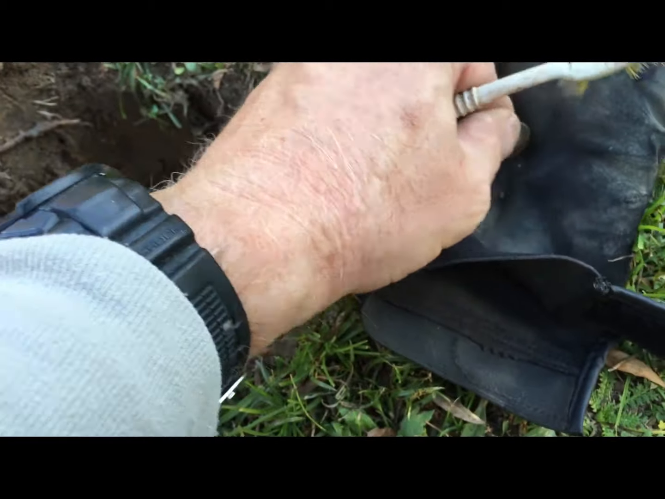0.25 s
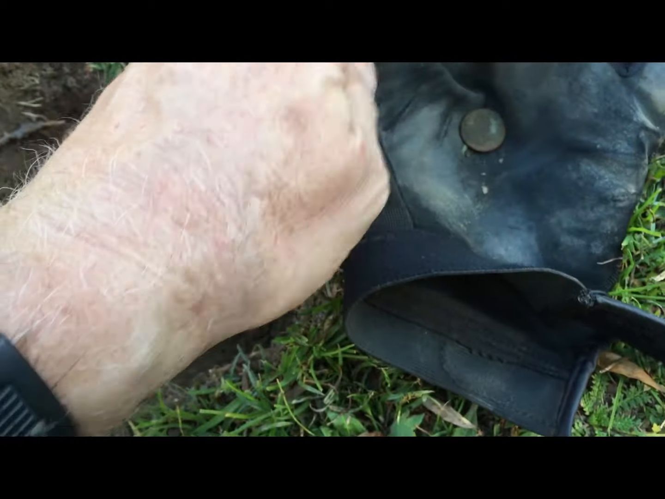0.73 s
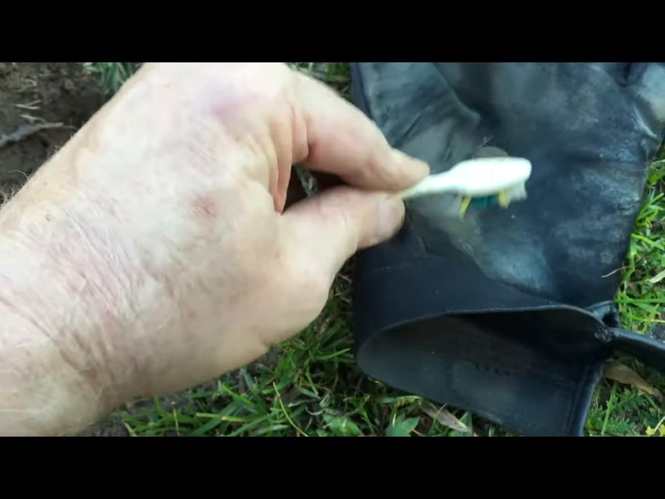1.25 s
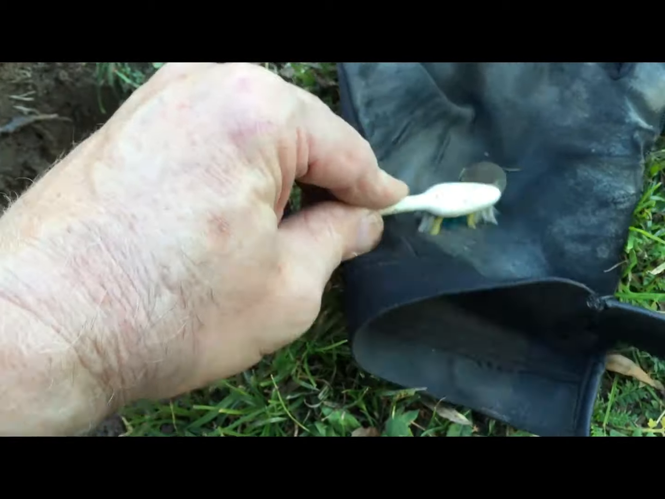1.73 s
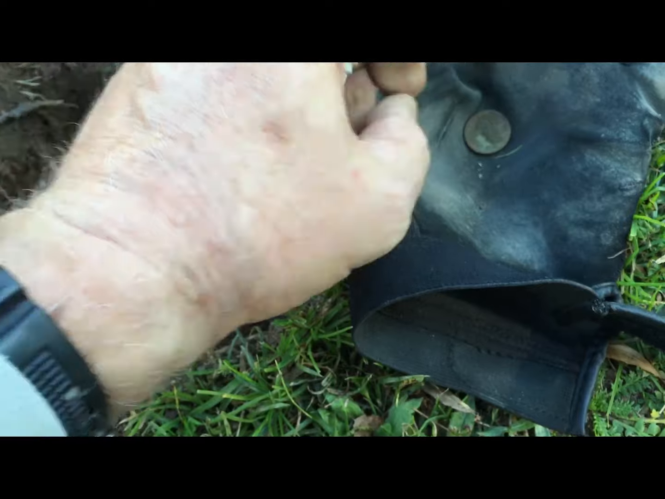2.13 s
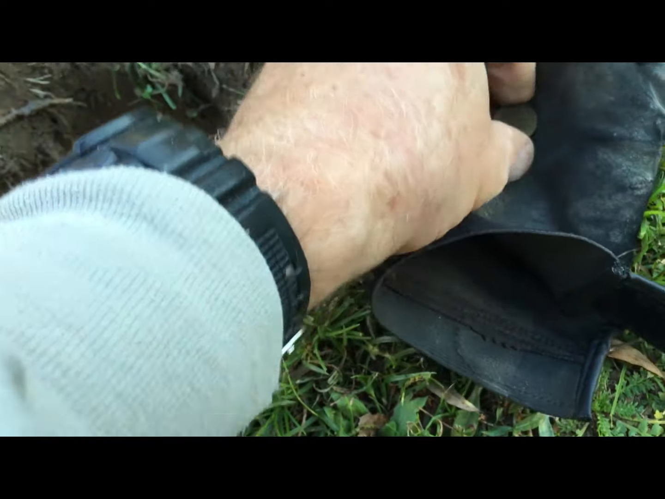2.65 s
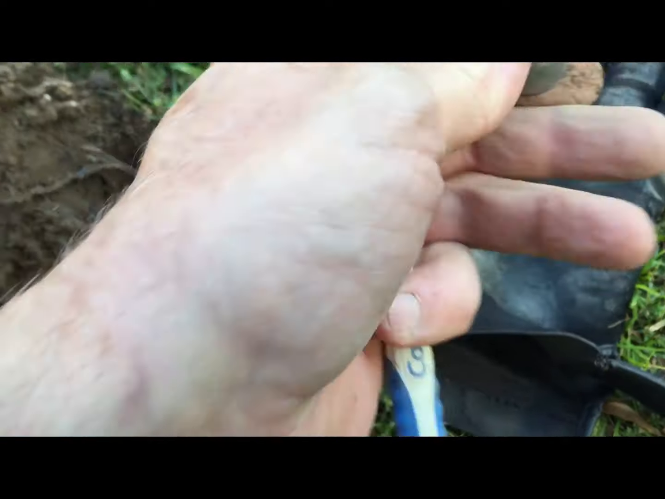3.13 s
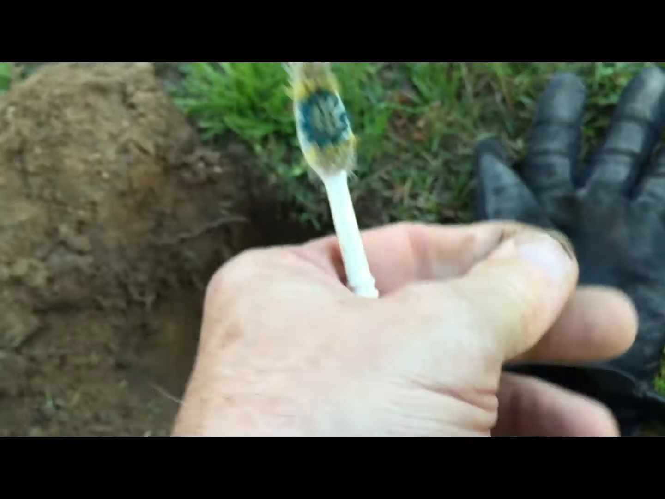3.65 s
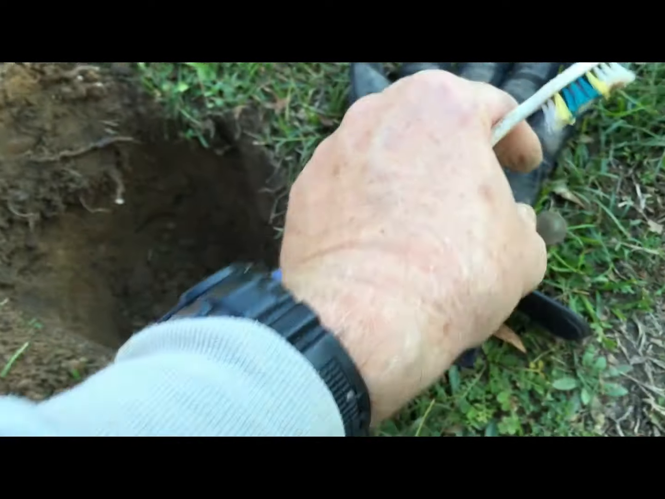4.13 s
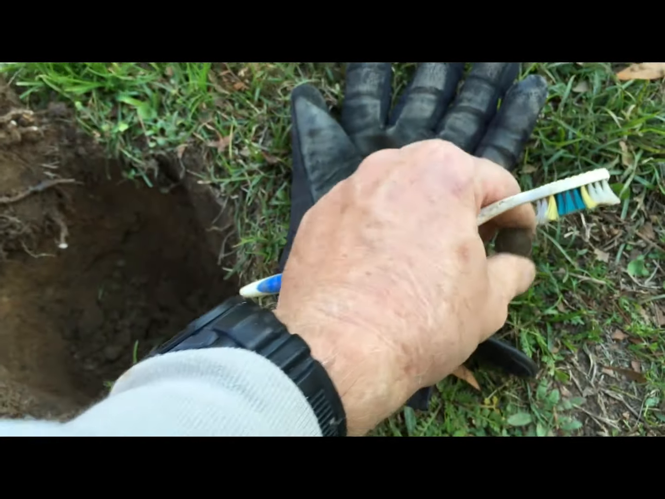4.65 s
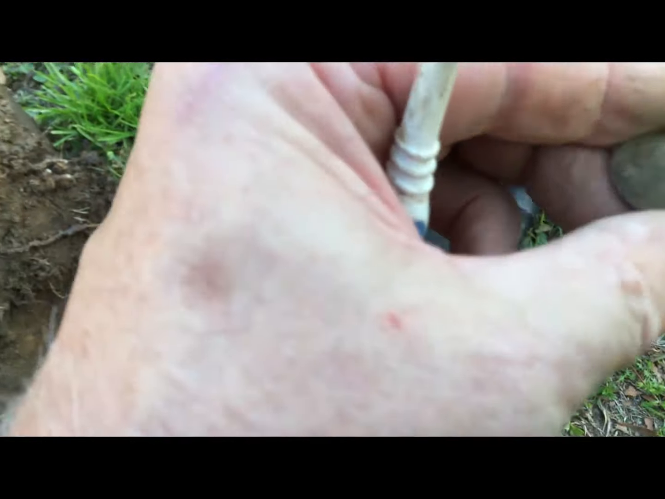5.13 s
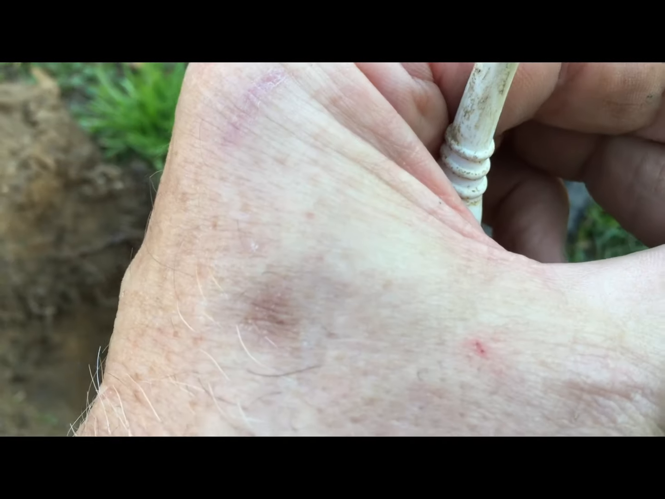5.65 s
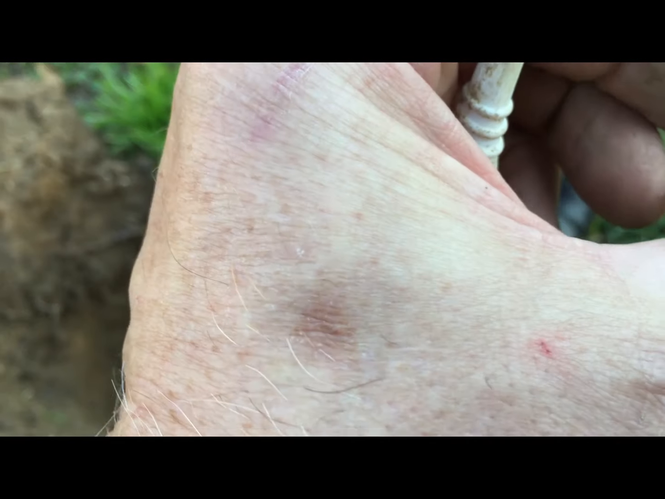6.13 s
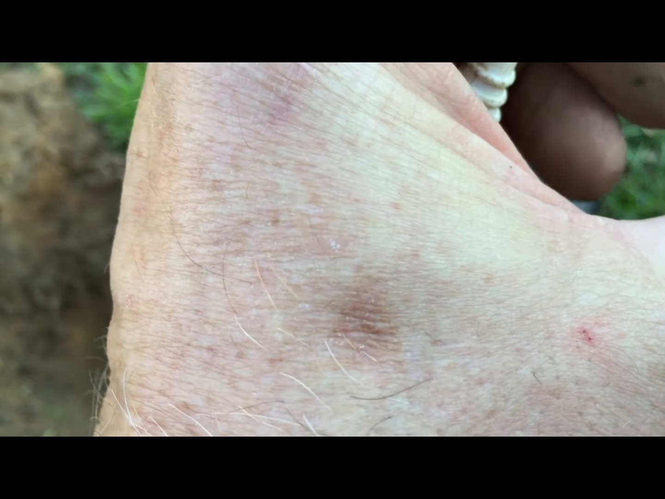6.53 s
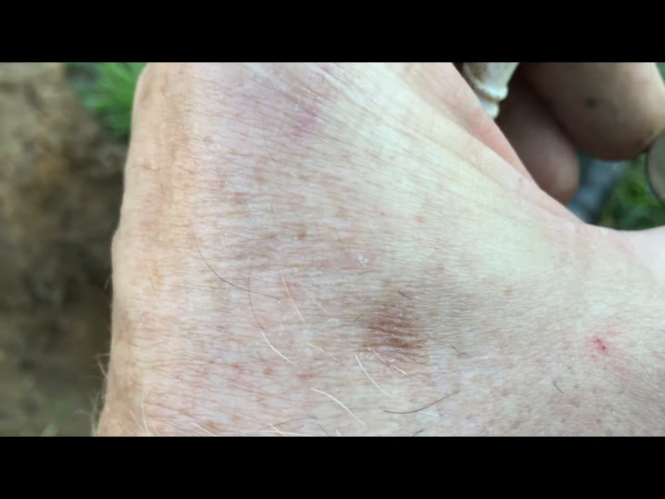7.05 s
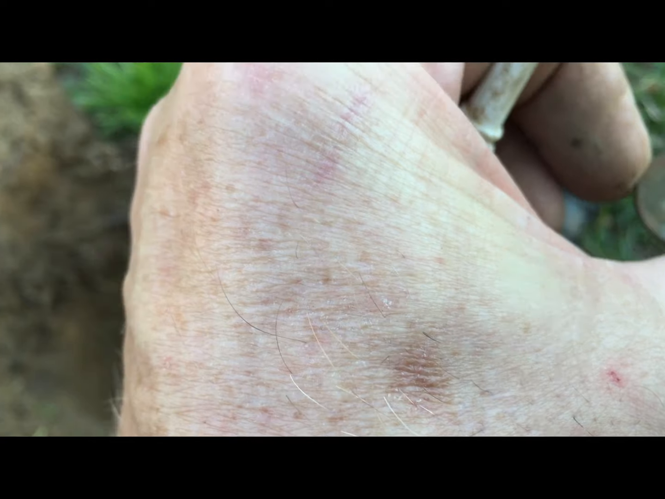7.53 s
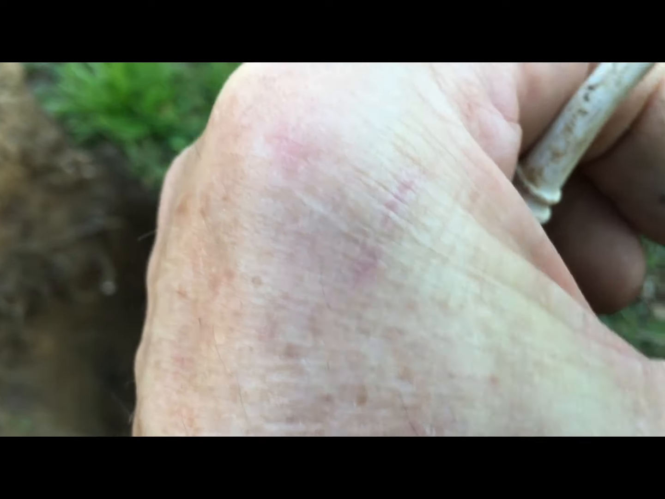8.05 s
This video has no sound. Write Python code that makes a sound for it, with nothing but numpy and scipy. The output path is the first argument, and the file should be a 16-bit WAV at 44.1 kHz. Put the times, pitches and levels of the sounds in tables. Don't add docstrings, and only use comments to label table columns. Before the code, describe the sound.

A low, booming engine hum dominates the distance, climbing and falling in pitch as a vehicle pulls away. In front of it, dry and close, a toothbrush scratches dirt from a coin lying on a leather glove, with tiny nail and grit ticks. Airy rubs of skin on the handle come next, then barely audible creaks. The ending is mostly soft traffic rumble and a quiet, steady engine. Single-channel, open-air handheld pickup.

```python
import sys
import numpy as np
from scipy import signal
from scipy.io import wavfile

SR = 44100
rng = np.random.default_rng(int(sys.argv[2]) if len(sys.argv) > 2 else 0)


def persist_wave(psi):
    counts = np.round(np.clip(psi, -1, 1) * 32767).astype(np.int16)
    wavfile.write(sys.argv[1], SR, np.atleast_2d(counts).T)


def level_to_linear(level):
    exponent = np.asarray(level, float) / 20
    return 10 ** exponent


N = 365789
TIME = np.arange(N) / SR

# pitch in Hz, width in Hz, level in dB.
GLOVE_MODES = [(1016, 700, 1), (1593, 350, 2), (1984, 224, 6), (2500, 180, 0)]
COIN_MODES = [(2970, 500, -1), (3700, 670, -3.5), (4400, 740, -3), (5450, 660, -4)]
BRISTLE_SHAFT_MODES = [(6000, 480, 3), (6720, 1000, 0.5), (9100, 1600, -6)]
BRISTLE_TIP_MODES = [(8450, 2200, -6.5), (10380, 1750, -7.5), (11860, 580, 8)]
# hardest moment in seconds, rise in seconds, fall in seconds, level in dB, brightness in dB.
BRUSH_STROKES = [(1.2, 0.028, 0.017, -63, -8), (1.216, 0.043, 0.03, -55, -1.5),
                 (1.26, 0.089, 0.075, -59, 1), (1.318, 0.065, 0.051, -48.5, 0),
                 (1.341, 0.037, 0.047, -48, 1), (1.395, 0.15, 0.075, -55, -2.5),
                 (1.585, .025, 0.07, -72, -20), (1.635, 0.062, 0.096, -52.5, -0.5),
                 (1.75, .07, 0.048, -56, -6.5), (1.795, 0.031, 0.06, -65.5, -7.5),
                 (1.895, 0.039, 0.03, -62.5, -8.5), (1.946, 0.087, 0.094, -55.5, -1.5),
                 (2.06, .07, 0.11, -49.5, 0), (2.11, 0.057, 0.05, -59, -4), (2.56, .12, 0.26, -62.5, -5),
                 (2.66, 0.093, 0.067, -56.5, -6.5), (2.86, .06, 0.073, -56, -5),
                 (2.899, .04, 0.042, -59.5, -9)]
FINGER_RUBS = [(0.0, .03, 0.02, -69, 8), (.115, 0.16, 0.25, -73, -7.5), (.3, 0.13, 0.11, -70.5, -4),
               (.368, .04, 0.023, -62.5, -8), (.49, 0.06, 0.068, -65.5, -10),
               (.575, 0.097, 0.072, -63, -13), (.66, 0.24, 0.22, -73.5, -8.5), (.78, 0.13, 0.044, -81, 16),
               (.934, 0.043, 0.044, -66.5, 5), (.99, 0.19, 0.17, -75, 17), (2.3, 0.11, 0.22, -77, 7),
               (2.78, 0.064, 0.057, -75, -1), (2.99, 0.079, 0.14, -65.5, -4.5),
               (3.17, 0.093, 0.049, -75, 31), (3.235, 0.11, .04, -72, -3), (3.288, 0.012, 0.056, -59, 14),
               (3.33, 0.087, 0.093, -65.5, 14), (3.84, 0.056, 0.045, -79, 31),
               (3.88, 0.021, 0.039, -56.5, 11), (3.94, 0.12, .08, -64, 19), (4.074, 0.016, 0.027, -61, 9),
               (4.828, 0.052, .05, -77.5, 1)]
# level in dB, share of the brightness (a factor), stretch of rise and fall (a factor).
BRUSH_PARTS = [(0, -0.8, 0.99), (0, -0.4, 0.9), (0, 0.5, 0.94), (0, 0.37, 0.87)]
FINGER_PARTS = [(0.58, -0.56, 0.93), (-0.32, -.25, 1.23), (0.4, 0.18, 0.93), (0.5, 0.36, 1.18)]
EDGE_DB, ROUNDNESS = 23.5, 1.35
GRIT_PER_S, GRIT_DB = 300, 18
FIRST_STROKE_S, CLEARING_S = 1.19, .3

# start in seconds, peak in dB, pitch in Hz, second pitch in Hz, time to fall by 60 dB in seconds.
TICKS = [(0.358, -45.5, 1016, 1500, 0.011), (.369, -47.5, 1380, 6300, 0.014),
         (0.592, -40, 900, 2340, 0.0083), (0.7818, -50, 9100, 10600, 0.0038),
         (.931, -35.5, 6000, 4700, 0.0023), (1.1975, -37.5, 3144, 1900, 0.0026),
         (1.215, -38, 1470, 5450, 0.0086), (1.251, -39.5, 1720, 3500, 0.0054),
         (1.284, -34.5, 5400, 3300, 0.0049), (1.5787, -42.5, 1020, 6000, 0.01),
         (1.598, -41, 4210, 5450, 0.0062), (1.61, -33, 4522, 8600, 0.0022),
         (2.6045, -43, 8500, 6000, 0.0037), (2.699, -46.5, 1954, 3500, 0.011),
         (2.9756, -33, 1698, 3756, 0.0055), (2.977, -44, 666, 401, 0.0077), (3.177, -50, 7700, 9600, 0.005),
         (3.2247, -38, 1564, 3570, 0.0079), (3.2857, -40, 7200, 4230, 0.0045),
         (3.8778, -36.5, 4600, 2310, 0.0025), (4.334, -56, 600, 10660, 0.012),
         (4.34, -46.5, 1300, 3980, 0.0037), (5.049, -56.5, 3700, 620, 0.015),
         (6.6293, -58, 11530, 9506, .006)]
SECOND_MODE_DB = -6.5

# start in seconds, length in seconds, pitch in Hz, width in Hz, level in dB.
CREAKS = [(4.13, .39, 1255, 110, -65.5), (4.28, .1, 1250, 120, -69), (4.19, .1, 1770, 100, -74),
          (4.46, .1, 1950, 110, -74), (4.57, .1, 1480, 100, -74), (4.72, .14, 1450, 120, -71.5),
          (4.5, .25, 4500, 250, -86), (4.5, .3, 5450, 300, -86), (4.825, .03, 5750, 500, -76),
          (5.615, .035, 2330, 100, -70), (5.81, .05, 1880, 90, -76), (6.33, .1, 2400, 200, -73.5),
          (6.34, .1, 2800, 200, -80), (6.45, .12, 2330, 220, -75), (6.6, .08, 1900, 120, -71),
          (1.785, .025, 2000, 300, -61), (1.812, .018, 3700, 1000, -63), (3.55, .17, 8500, 4000, -80),
          (4.2, .25, 2450, 300, -77)]
# start in
# seconds, length in seconds, pitch in Hz, width in Hz, level in dB.
SLIDES = [
    (3.29, .12, 7400, 2592, -65),
    (3.81, .1, 8400, 3800, -55.5),
    (3.9, 0.092, 7200, 2500, -63.5),
    (.08, .1, 1850, 800, -65.5),
    (3.85, .14, 2310, 250, -68),
    (4.058, .034, 7300, 3900, -51.5),
    (.27, 0.066, 1530, 180, -70),
    (4.37, .02, 3990, 450, -74),
]

# time in seconds, firing tone in Hz, firing tone level in dB, lower tone level in dB.
REVS = [(0, 112.7, -40, -44.5), (.62, 128.5, -40.5, -39.5), (.95, 142.8, -34.5, -44.5),
        (1.42, 160, -41, -43.5), (1.58, 155.2, -38, -46), (1.85, 128, -40.5, -39),
        (2.6, 131.1, -38.5, -47.5), (3.15, 140.9, -37, -40.5), (3.64, 99.03, -41.5, -46),
        (4.0, 104, -42, -46), (4.45, 109.8, -42, -59), (4.85, 114.5, -39.5, -45), (5.5, 122.8, -43, -47),
        (5.85, 124.1, -51.5, -44.5), (6.2, 126.5, -40, -47), (6.65, 127.1, -51.5, -43.5),
        (7.05, 102.7, -65, -46), (8.29, 92.45, -93, -74)]
LOWER_ORDER = .632
# multiple of the firing tone, level in dB.
SIDE_ORDERS = [(.375, -15.5), (.875, -12.5), (1.25, -22.5), (1.5, -34.5), (.75, -16.5)]
# time in seconds, pitch in Hz, level in dB.
BOOM = [
    (0, 65.14, -33.5),
    (.8, 65.55, -47),
    (1.4, 66.34, -32.5),
    (1.75, 68.45, -42),
    (2.45, 67.8, -42),
    (2.8, 68.94, -34),
    (3.15, 70.3, -39.5),
    (3.502, 59.5, -44.5),
    (4.6, 58.92, -55),
]
# time in seconds, pitch in Hz, level in dB.
COASTING_BOOM = [
    (5.95, 79.1, -75),
    (6.22, 75, -46),
    (6.48, 64.6, -54),
    (6.85, 63.8, -52),
]
# delay in seconds, level in dB.
ECHOES = [(.17, 0), (.42, -2), (.62, -5)]
# start in seconds, length in seconds, echo level in dB.
SHIFTS = [
    (1.45, .85, -2),
    (3.3, .75, -11),
]
WALLS_DB = -19

# time in seconds, firing tone in Hz, level in dB.
IDLER = [
    (0, 33.0, -75),
    (5.3, 33.0, -66),
    (6.2, 33.0, -58),
    (8.29, 33.0, -56.5),
]
# multiple of its firing tone, level in dB.
IDLER_ORDERS = [(4, -8), (5, 1), (6, 0), (7, -14), (8, -6), (1.25, -3)]

# time in seconds, level in dB.
TRAFFIC = [
    (0.0, -65.5),
    (1.04, -63.5),
    (1.61, -54.5),
    (2.3, -62.5),
    (2.84, -58),
    (4.1, -64.5),
    (5.1, -71.5),
    (7.1, -69),
    (7.41, -67.5),
    (8.29, -71.5),
]
# pitch in Hz, level in dB per Hz.
RUMBLE = [(25, -31), (40, -16.5), (65, 2), (120, 0), (200, -4.5), (270, -8.5), (360, -50)]
HUSH = [(600, -26.5), (730, -1), (875, -7.5), (990, 1.5), (1300, -1.5), (1740, -1), (2150, -6.5),
        (3480, -14.5), (6740, -18.5), (10500, -22.5), (14000, -18.5)]
RUMBLE_DB, RUMBLE_FOLLOWS = -46, 0.089
HUSH_DB, HUSH_FOLLOWS = -70, -0.17
# pitch in Hz, width in Hz, level in dB.
DRONE_MODES = [(212.8, 28.5, 15.5), (330, 63, 0.5), (368, 58, -5.5), (440, 72, -6.5), (552.4, 77, -3)]
# start in seconds, length in seconds, pitch in Hz, width in Hz, level in dB.
SWELLS = [
    (.33, .27, 221.4, 30, -49),
    (4.199, .2, 298, 250, -58),
    (7.05, .45, 125, 40, -50),
    (3.93, 0.23, 173, 25, -49.5),
    (7.149, .45, 374, 169, -63),
    (7.85, .4, 397, 178, -68.5),
]

TOP_HZ = 12250


def rms_one(x):
    return x / np.sqrt(np.mean(x ** 2) + 1e-20)


def in_time(rows):
    s, *columns = np.transpose(rows)
    return [np.interp(TIME, s, column) for column in columns]


def drift(rate):
    r = np.exp(-40 * np.pi * rate / SR)
    chance = rng.standard_normal(N // 20 + 4002)
    slow = signal.lfilter([1], [1, -2 * r, r * r], chance)[4000:]
    return np.interp(np.arange(N) / 20, np.arange(len(slow)), rms_one(slow))


def resonance(x, hz, width_hz):
    r = np.exp(-np.pi * width_hz / SR)
    ringing = [1, -2 * r * np.cos(2 * np.pi * hz / SR), r * r]
    return signal.lfilter(np.array([1, 0, -1]) * (1 - r * r) / 2, ringing, x)


def body(x, modes, patchy_db, patch_rate):
    out = 0
    for k, (hz, width_hz, db) in enumerate(modes):
        wide = 1.28 * width_hz
        rung = resonance(resonance(x, hz, wide), hz, wide)
        out = out + (-1) ** k * level_to_linear(db + patchy_db * drift(patch_rate)) * rung
    return rms_one(out)


def brushing():
    tufts = level_to_linear(1.6 * drift(130) + .8 * drift(35))
    since = TIME - FIRST_STROKE_S
    grit_rate = (since > 0) * np.exp(-since / CLEARING_S) * GRIT_PER_S
    grit = (rng.random(N) < grit_rate / SR) * level_to_linear(GRIT_DB + 3 * rng.standard_normal(N))
    slip_size = level_to_linear(2.5 * np.minimum(rng.exponential(1, N), 5))
    slips = (rng.random(N) < 6000 / SR) * slip_size * rng.choice([-1, 1], N)
    friction = tufts * (rms_one(slips) + .8 * rng.standard_normal(N) + grit)
    gains = np.sqrt(pressure(BRUSH_STROKES, BRUSH_PARTS) + pressure(FINGER_RUBS, FINGER_PARTS))
    parts = GLOVE_MODES, COIN_MODES, BRISTLE_SHAFT_MODES, BRISTLE_TIP_MODES
    return sum(gain * body(friction, modes, patchy_db=1.4, patch_rate=40) for gain, modes in zip(gains, parts))


def pressure(strokes, parts):
    t = np.arange(0, N + 32, 32) / SR
    power = 1e-12
    part_db, share, stretch = np.transpose(parts)[:, :, None]
    for s, rise, fall, level_db, brightness_db in strokes:
        away = np.where(t < s, (s - t) / rise, (t - s) / fall) / stretch
        stroke_db = level_db + part_db + share * brightness_db - EDGE_DB * away ** ROUNDNESS
        power = power + level_to_linear(stroke_db) ** 2
    return np.array([np.interp(TIME, t, p) for p in power])


def ticks():
    out, t = np.zeros(N + 2000), np.arange(2000) / SR
    for s, peak_db, hz, second_hz, t60 in TICKS:
        knock = 3.9 * np.exp(-t * 9000)
        push = (0.17 * rng.standard_normal(2000) + knock) * level_to_linear(-60 * t / t60)
        width_hz = 8.5 / t60
        first = steep(push, hz, min(width_hz, hz))
        second = steep(push, second_hz, min(width_hz, second_hz))
        ring = first / abs(first).max() - level_to_linear(SECOND_MODE_DB) * second / abs(second).max()
        at = round(s * SR)
        out[at:at + 2000] += level_to_linear(peak_db) * ring
    return out[:N]


def steep(x, hz, width_hz):
    for _ in range(3):
        x = resonance(x, hz, width_hz)
    return x


def narrow_noises(rows):
    out = np.zeros(N)
    for s, length, hz, width_hz, level_db in rows:
        rub = rng.standard_normal(SR // 2)
        sung = resonance(resonance(rub, hz, width_hz), hz, width_hz)[-round(length * SR):]
        swell = np.hanning(len(sung)) ** .5
        out[round(s * SR):][:len(sung)] += level_to_linear(level_db) * rms_one(sung) * swell
    return out


def vehicle():
    return_db = WALLS_DB
    for s, length, db in SHIFTS:
        return_db = return_db + (db - WALLS_DB) * np.sin(np.pi * np.clip((TIME - s) / length, 0, 1)) ** .5
    hz, firing_db, lower_db = in_time(REVS)
    firing = tone(hz, wobble_hz=.7, flutter_db=2.4)
    for multiple, db in SIDE_ORDERS:
        firing += level_to_linear(db) * tone(multiple * hz, wobble_hz=1.0, flutter_db=4.0)
    lower = tone(LOWER_ORDER * hz, wobble_hz=0.36, flutter_db=1.5)
    out = echoed(level_to_linear(firing_db) * firing, return_db) + echoed(level_to_linear(lower_db) * lower, WALLS_DB)
    for boom in BOOM, COASTING_BOOM:
        hz, level_db = in_time(boom)
        out += while_heard(boom) * level_to_linear(level_db) * tone(hz, wobble_hz=0.31, flutter_db=0.5)
    return out


def tone(hz, wobble_hz, flutter_db):
    phase = 2 * np.pi * np.cumsum(hz + wobble_hz * drift(4.8)) / SR
    return np.sqrt(2) * np.sin(phase + rng.uniform(0, 2 * np.pi)) * level_to_linear(flutter_db * drift(5.7))


def echoed(x, return_db):
    late = sum(level_to_linear(db) * np.r_[np.zeros(round(s * SR)), x][:N] for s, db in ECHOES)
    return x + level_to_linear(return_db) * late


def while_heard(rows):
    return np.clip((rows[-1][0] - TIME) / 0.12, 0, 1)


def idler():
    hz, level_db = in_time(IDLER)
    tones = sum(level_to_linear(db) * tone(k * hz, wobble_hz=0.29, flutter_db=2.5) for k, db in IDLER_ORDERS)
    return level_to_linear(level_db) * tones


def traffic():
    near_db, = in_time(TRAFFIC)
    swing_db = near_db - near_db.mean()
    rumble = level_to_linear(RUMBLE_DB + RUMBLE_FOLLOWS * swing_db) * banded_noise(RUMBLE, patchy_db=3.0)
    hush = level_to_linear(HUSH_DB + HUSH_FOLLOWS * swing_db) * banded_noise(HUSH, patchy_db=1.5)
    drone = level_to_linear(near_db + 4.5) * body(rng.standard_normal(N), DRONE_MODES, patchy_db=2.8, patch_rate=6)
    return rumble + hush + drone + narrow_noises(SWELLS)


def banded_noise(spectrum, patchy_db):
    hz, level_db = np.transpose(spectrum)
    count = int(2.5 * np.log2(hz[-1] / hz[0])) + 1
    edges = np.geomspace(hz[0], min(hz[-1], .45 * SR), count)
    together = drift(0.94)
    white = rng.standard_normal((2, N + SR))
    out = 0
    for k, (low, high) in enumerate(zip(edges, edges[1:])):
        band_filter = signal.butter(2, [low, high], "band", fs=SR, output="sos")
        band = signal.sosfilt(band_filter, white[k % 2])[SR:]
        centre_db = np.interp(np.log(low * high) / 2, np.log(hz), level_db)
        out = out + level_to_linear(centre_db + patchy_db * (.5 * together + drift(5.2))) * band
    return rms_one(out)


def scene():
    close = brushing() + ticks() + narrow_noises(CREAKS) + narrow_noises(SLIDES)
    far = vehicle() + idler() + traffic()
    return (close + far)[None]


def low_pass(x):
    return signal.sosfilt(signal.butter(12, 12450, fs=SR, output="sos"), x)


def record(dry):
    ported = dry - .38 * resonance(dry, 10450, 700)
    to_nearest_end = np.minimum(np.arange(N), np.arange(N)[::-1])
    edge = np.minimum(to_nearest_end / (.006 * SR), 1)
    top_cut = signal.cheby2(16, 60, TOP_HZ, fs=SR, output="sos")
    mix = signal.sosfilt(top_cut, edge * ported)
    return low_pass(mix)


dry = scene()
out = record(dry)
persist_wave(out)
```